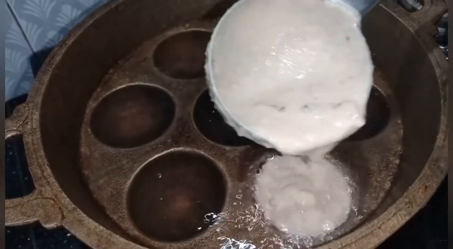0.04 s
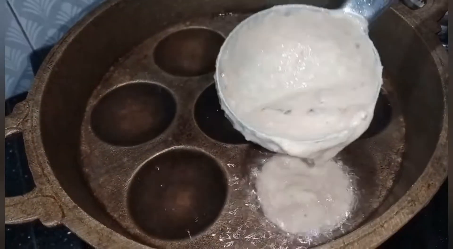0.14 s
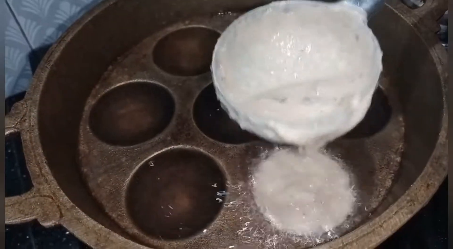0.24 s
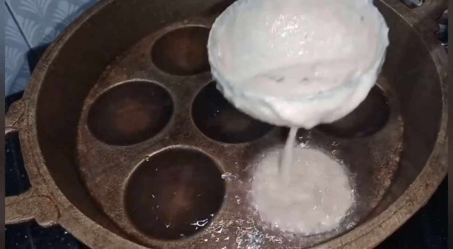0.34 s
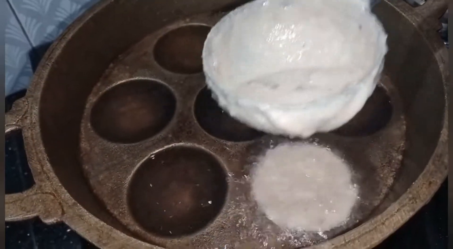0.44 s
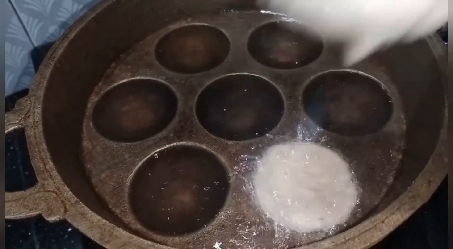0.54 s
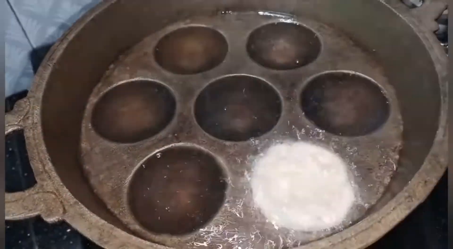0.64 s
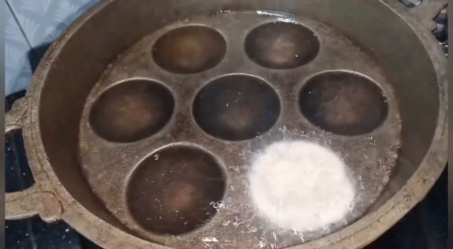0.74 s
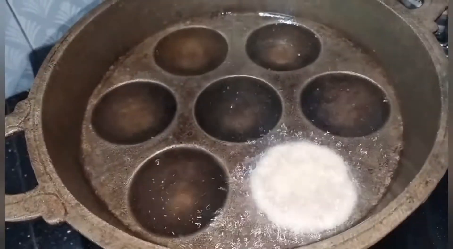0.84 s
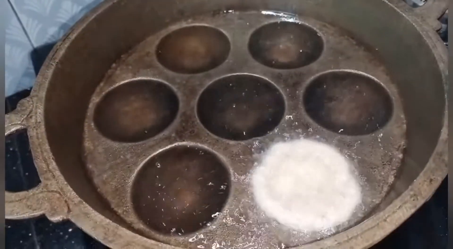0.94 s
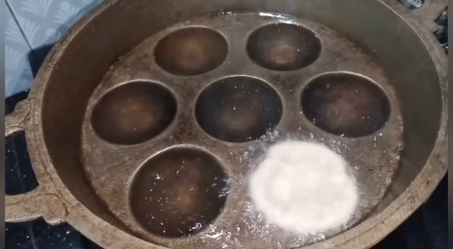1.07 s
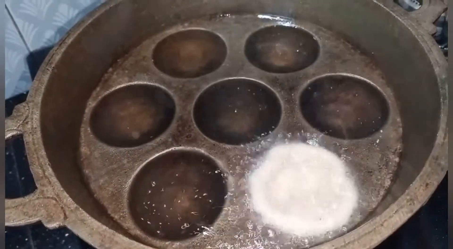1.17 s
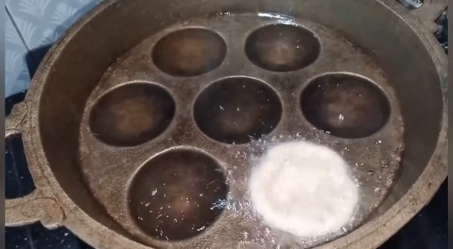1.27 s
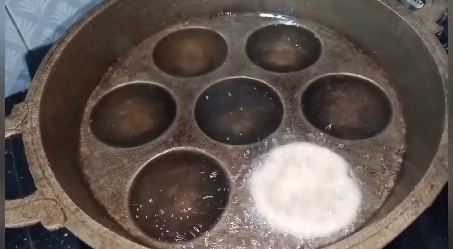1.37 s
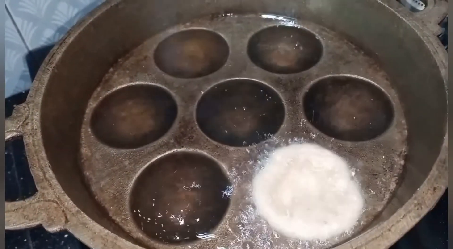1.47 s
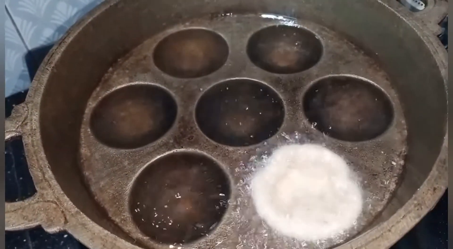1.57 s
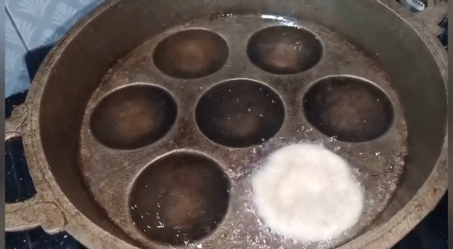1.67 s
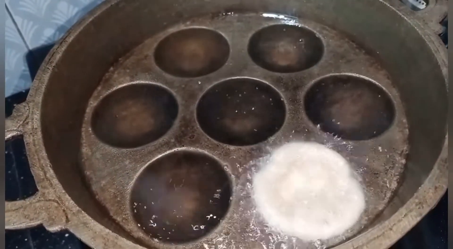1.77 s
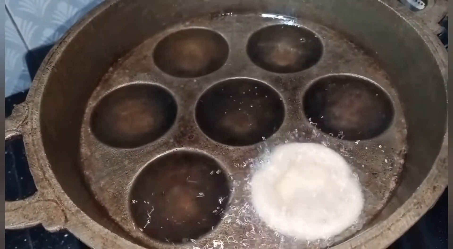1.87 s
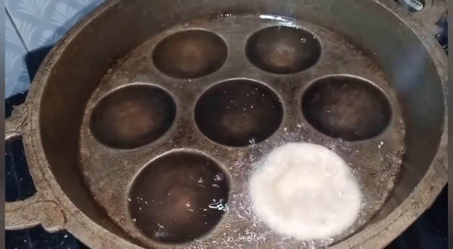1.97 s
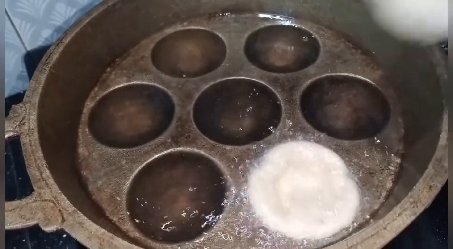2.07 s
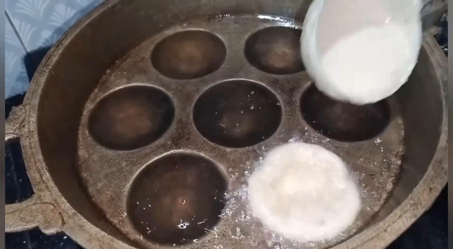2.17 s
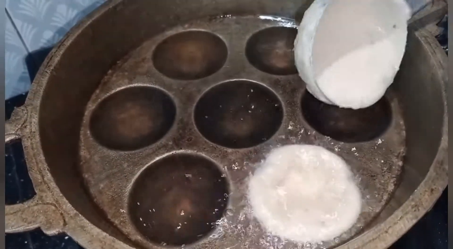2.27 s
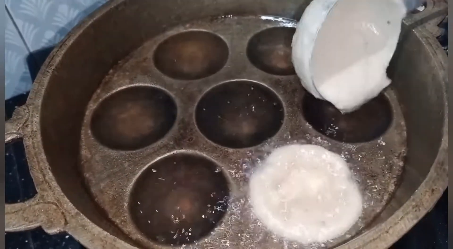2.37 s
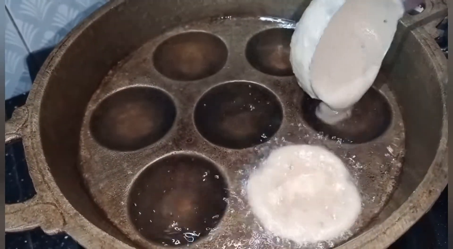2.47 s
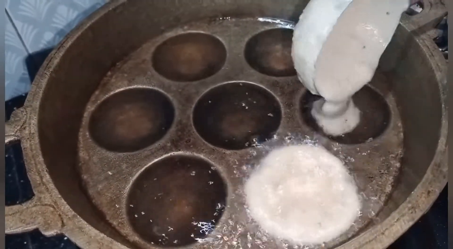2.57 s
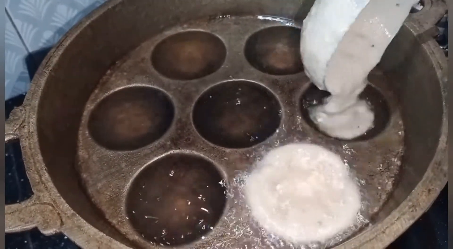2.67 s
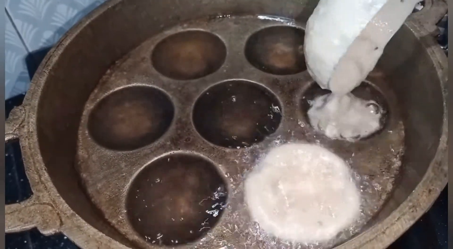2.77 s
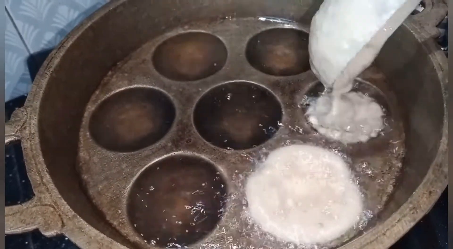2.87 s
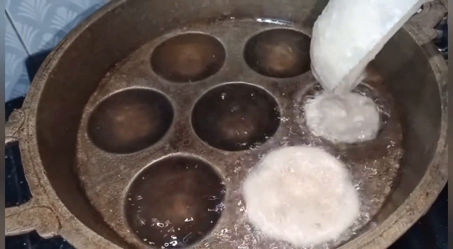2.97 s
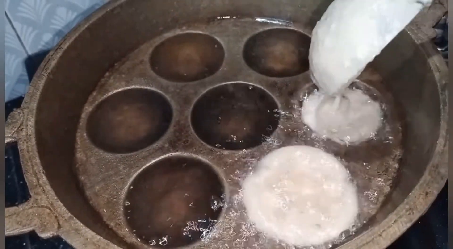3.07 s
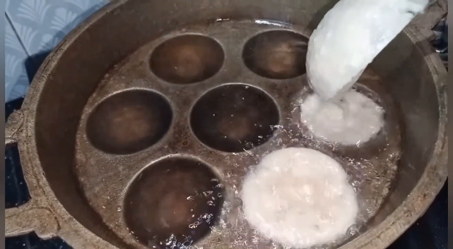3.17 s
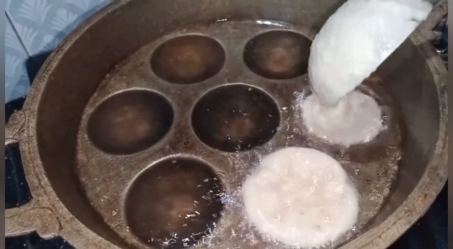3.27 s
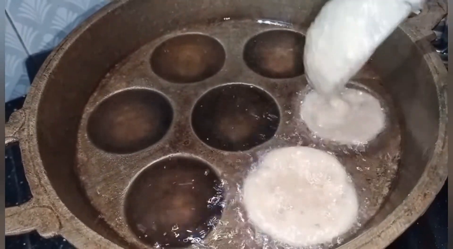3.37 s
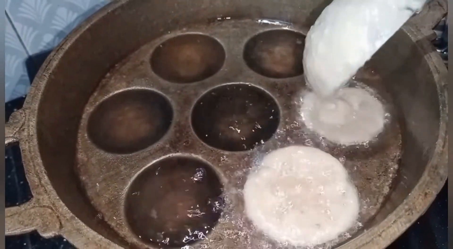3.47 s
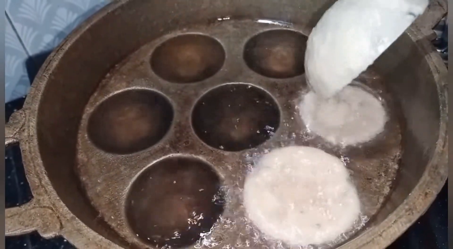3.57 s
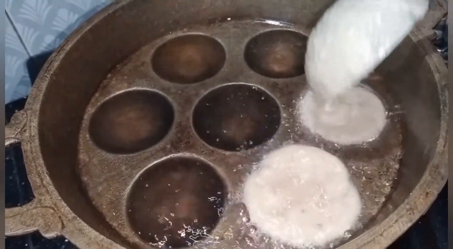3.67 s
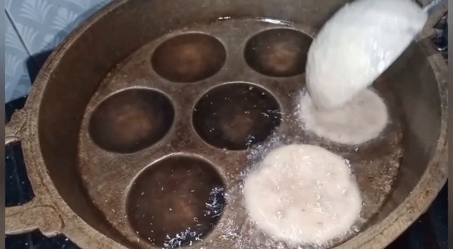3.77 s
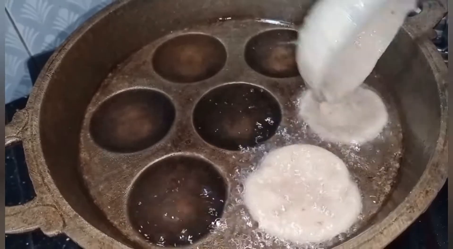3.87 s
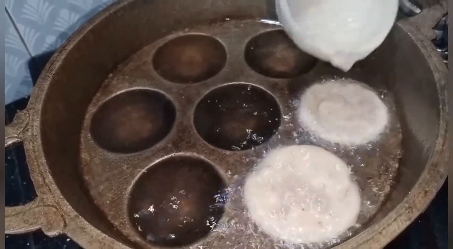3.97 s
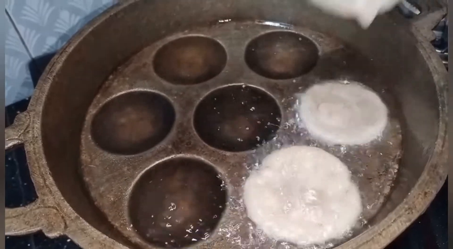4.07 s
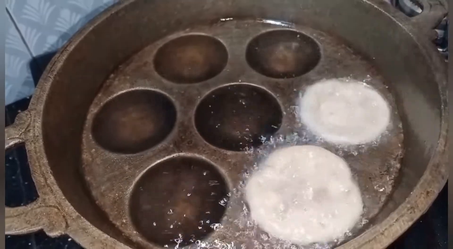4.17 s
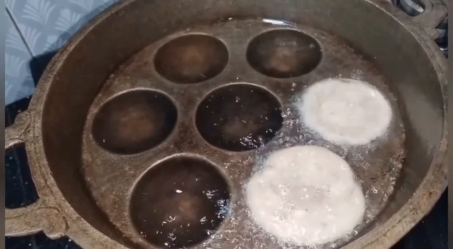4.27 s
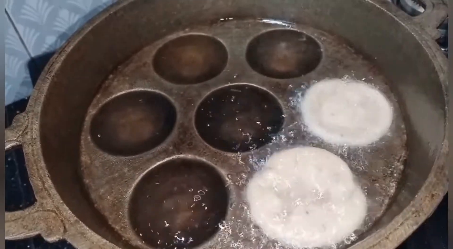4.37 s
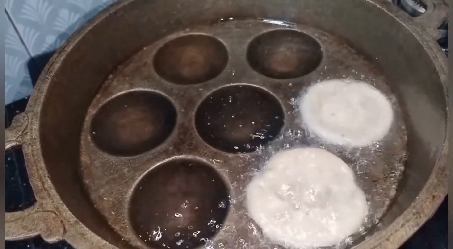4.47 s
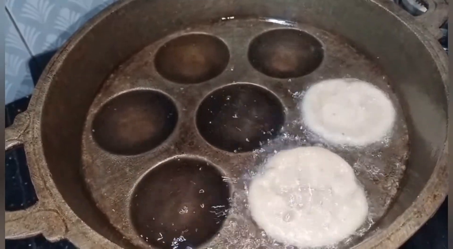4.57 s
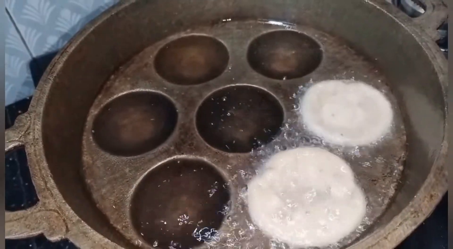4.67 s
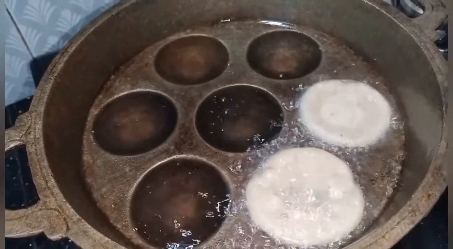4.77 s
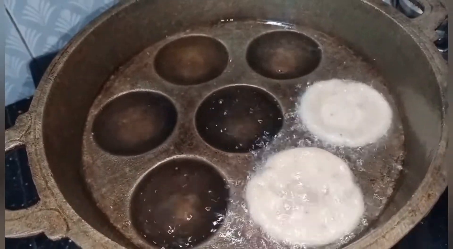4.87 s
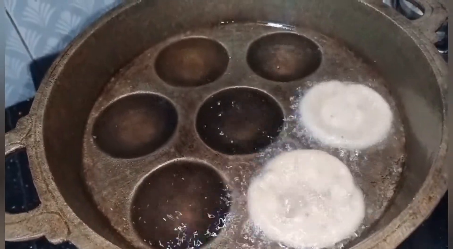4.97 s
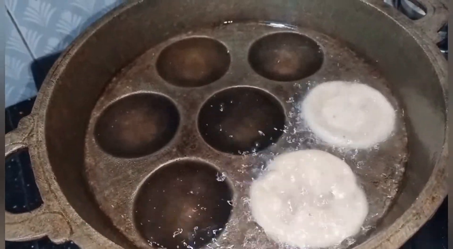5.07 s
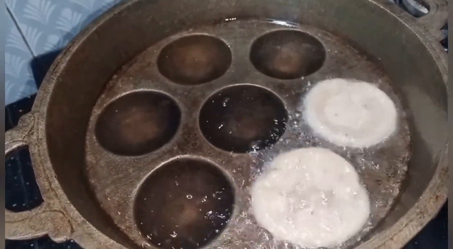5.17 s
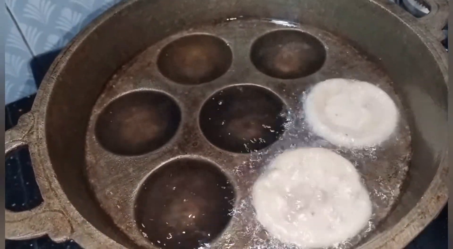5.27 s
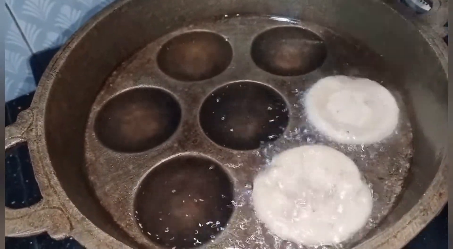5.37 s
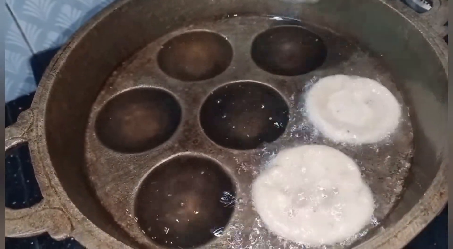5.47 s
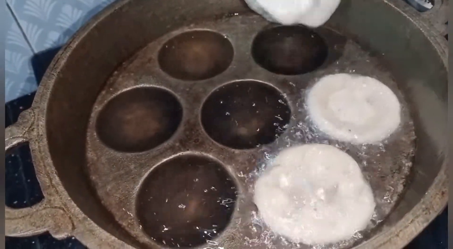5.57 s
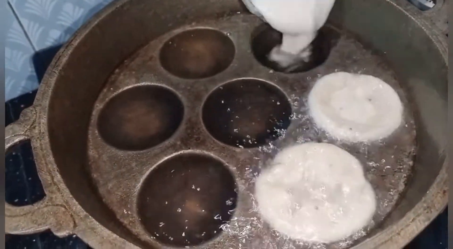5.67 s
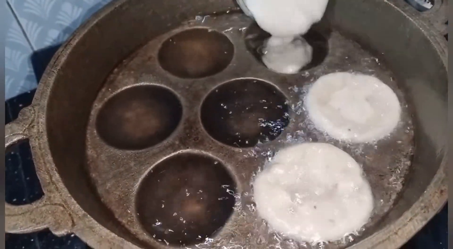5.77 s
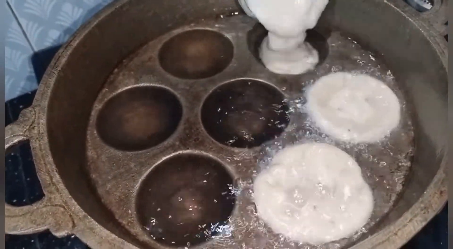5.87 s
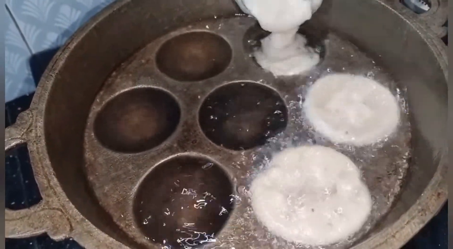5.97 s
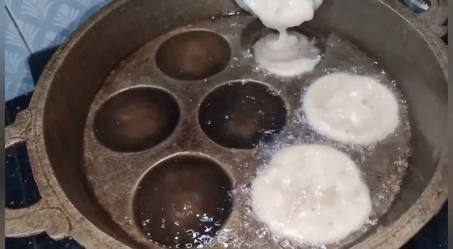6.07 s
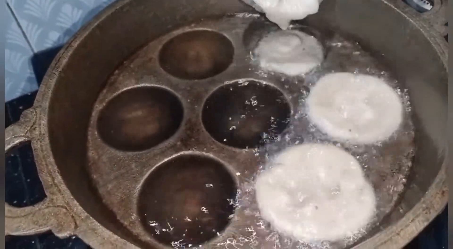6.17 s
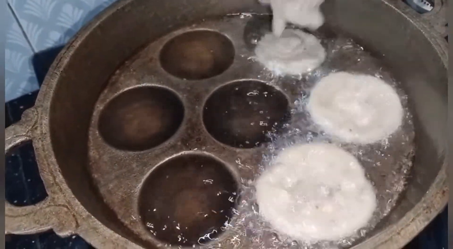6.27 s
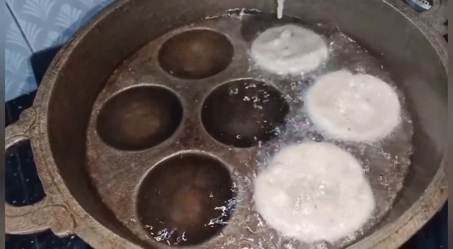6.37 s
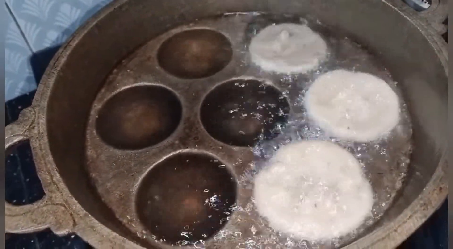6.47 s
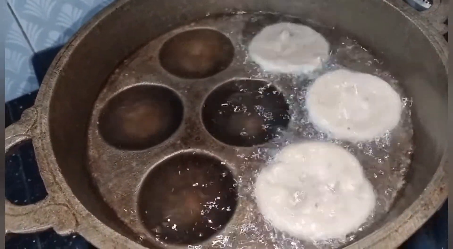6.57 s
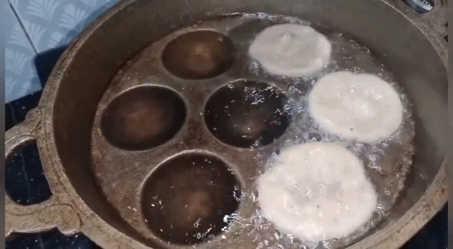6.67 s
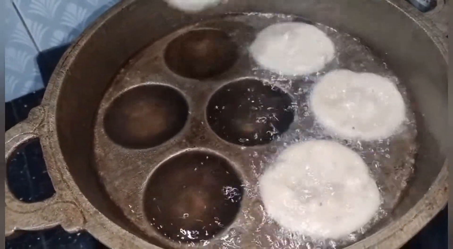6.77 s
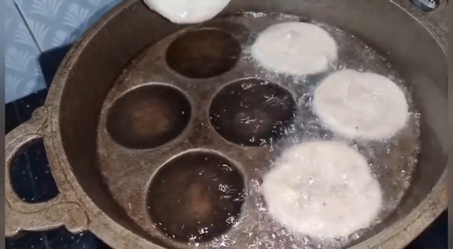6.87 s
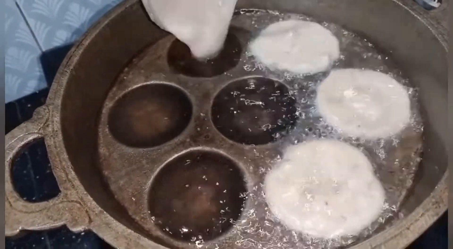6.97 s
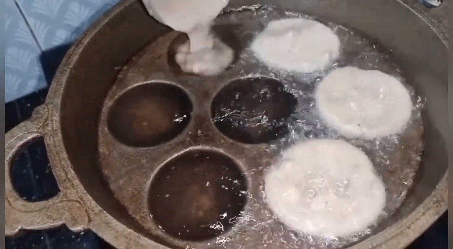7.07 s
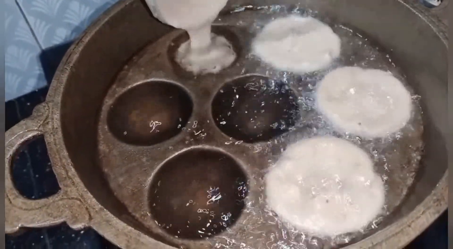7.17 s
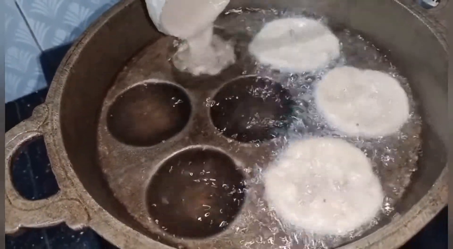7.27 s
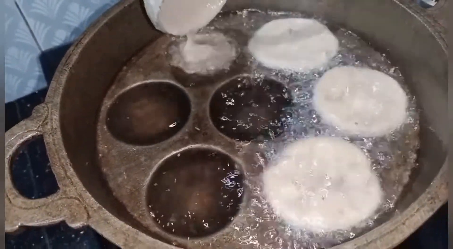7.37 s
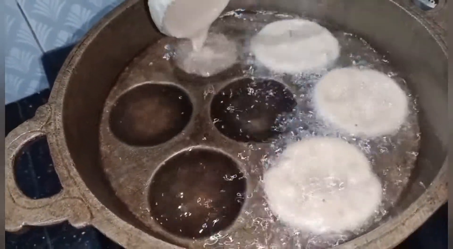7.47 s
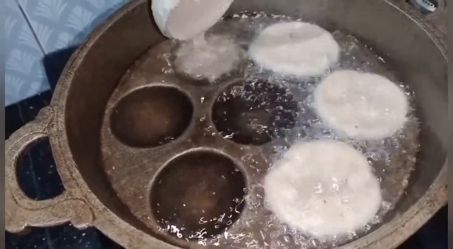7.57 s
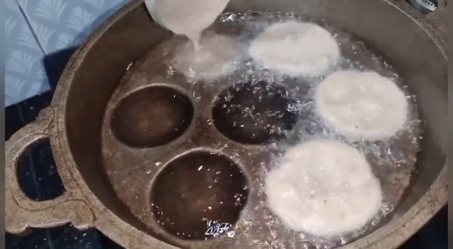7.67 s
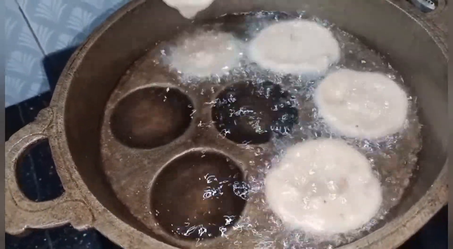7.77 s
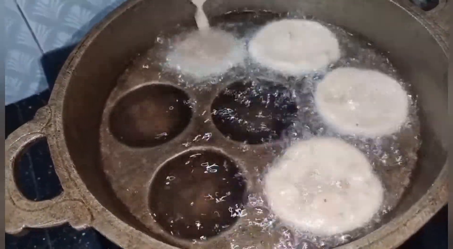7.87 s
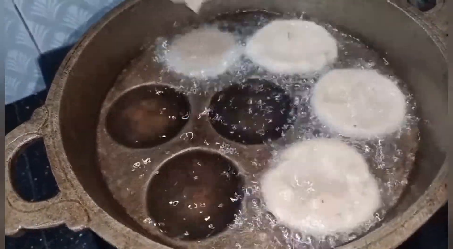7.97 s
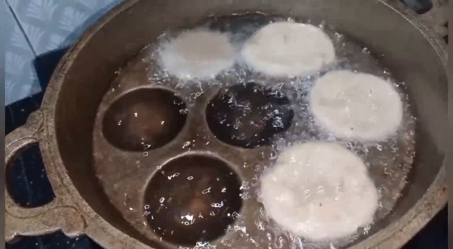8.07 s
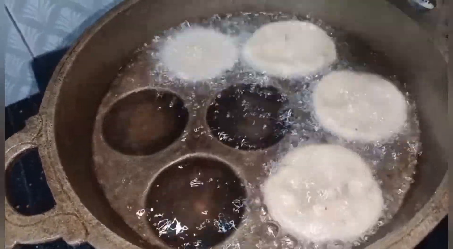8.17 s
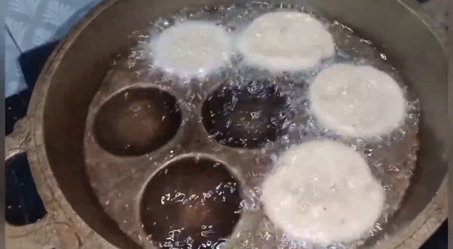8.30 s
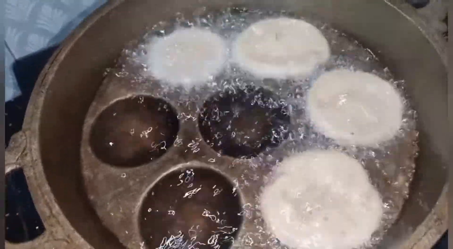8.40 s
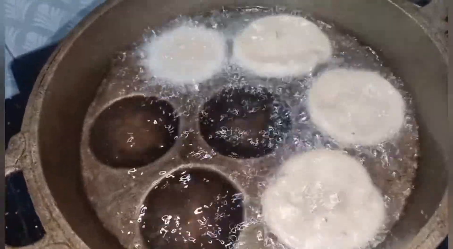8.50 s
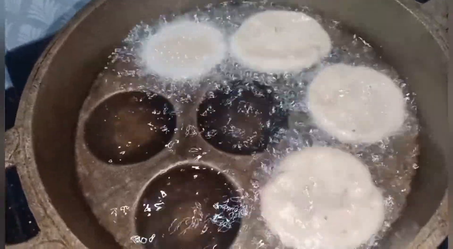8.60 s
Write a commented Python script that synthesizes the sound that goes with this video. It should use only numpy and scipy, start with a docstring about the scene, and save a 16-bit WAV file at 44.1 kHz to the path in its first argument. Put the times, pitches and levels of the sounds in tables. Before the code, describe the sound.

Close to a cast metal pan in a small kitchen, batter already boils fiercely in hot oil, then its sizzle thins. More ladlefuls land near 2.5, 5.7 and 7.1 seconds, each with a short sinking gurgle and a fresh surge of bubbling. Fine fizz, crackle and sharp spits run throughout over a faint stove rush, with two or three muffled bumps at the end.

```python
"""Batter frying in a hollowed pan

A mono microphone stands close to a cast metal pan in a kitchen, over the low rush of a stove.
Each ladleful lands with a sinking gurgle and boils hard; steam bubbles chirp and thin out as it sets.
Damped rings make the bubbles, filtered random ticks the crackle, fizz and mist of the oil, short
bursts the spits. Resonances of the pan colour all but the plips, spits and knocks; a short echo follows."""
import sys
import numpy as np
from scipy import signal
from scipy.fft import rfft, irfft, next_fast_len
from scipy.io import wavfile
from scipy.ndimage import uniform_filter1d, map_coordinates

SR = 44100
rng = np.random.default_rng(int(sys.argv[2]) if len(sys.argv) > 2 else 0)


def wav_out(sig):
    """Save sig, one row per channel (or a flat mono array), as 16-bit PCM at SR to the path in sys.argv[1]."""
    wavfile.write(sys.argv[1], SR, np.round(np.clip(np.atleast_2d(sig).T, -1, 1) * 32767).astype(np.int16))


N = 381024

# ladlefuls of batter, one to a hollow; the first is already down (levels before the trims below):
# (first touch t/s, spreading/s, full boil/s, setting/s, boil level/dB, spitting oil level/dB,
#  power of time that the frying grows by, steam bubble f/Hz, gurgle level/dB, deepest gurgle f/Hz,
#  gurgle length/s)
LADLES = [(-.55, 0.58, 0.084, 2.23, -23.5, -28, 0.57, 1800, -46, 638, 0.92),
          (2.48, 0.69, 0.38, 2.8, -26.5, -34.5, 0.76, 2240, -40.5, 679, .9),
          (5.719, 0.6, 0.09, 2.7, -24, -32, 0.65, 2272, -46, 602, .72),
          (7.149, 0.62, 0.075, 4.1, -22.5, -29.5, 0.59, 2133, -44.5, 574, 0.74)]
BOIL_COLUMN, OIL_COLUMN, STEAM_COLUMN = 4, 5, 7


def amp(db):
    """Decibels to gain."""
    return 10 ** (np.asarray(db) / 20)


def unit(x):
    """Scale to rms 1."""
    return x / np.sqrt(np.mean(x ** 2) + 1e-20)


def along(points, hz):
    """Interpolate (f/Hz, value) points on a log frequency axis."""
    f, v = np.transpose(points)
    return np.interp(np.log(hz + 1), np.log(f + 1), v)


def curves(rows):
    """One value per sample for each column after the time."""
    s, *columns = np.transpose(rows)
    return [np.interp(np.arange(N) / SR, s, column) for column in columns]


def wobble(rate):
    """A smooth random curve, rate knots a second."""
    knots = rng.standard_normal(N // 20)
    return unit(map_coordinates(knots, [np.arange(N) * rate / SR], mode="wrap"))


def coloured(x, points, peaks=(), size=8192):
    """Minimum-phase filter: the source's own spectrum and peaks, times those of the pan."""
    # peaks and nulls of the air between the pan's walls: (f/Hz, width/Hz, level/dB)
    pan_peaks = [(353, 77, 7), (543.6, 73, 9.5), (606, 91, -8), (722, 59, 6), (943, 35, 2.5),
                 (1906, 55, -7), (2253, 1260, 8.5), (3110, 99, 3.5), (4210, 140, -5.5), (5020, 170, -4.5)]
    hz = np.fft.rfftfreq(size, 1 / SR)
    db = along(points, hz)
    for f, width, gain in [*pan_peaks, *peaks]:
        db = db + gain / (1 + (2 * (hz - f) / width) ** 2)
    # folding the cepstrum forward in time makes the filter causal
    cepstrum = irfft(np.log(amp(db)))
    cepstrum[1:size // 2] *= 2
    cepstrum[size // 2 + 1:] = 0
    return signal.fftconvolve(x, irfft(np.exp(rfft(cepstrum))))[:N]


def placed(times, grains):
    """Sum one row of samples at each start time."""
    index = (np.abs(times) * SR).astype(int)[:, None] + np.arange(grains.shape[1])
    return np.bincount(index.ravel(), grains.ravel(), N)[:N]


def bubbles(times, hz, gain, cycles, rise, size=400):
    """Damped rings whose pitch climbs by the share rise as each bubble nears the surface."""
    # age is in decay times, each as long as the given number of cycles
    age = np.arange(size) / SR * hz[:, None] / cycles
    phase = cycles * (age + rise * (age - 1 + np.exp(-age)))
    swell = np.exp(-age) * (1 - np.exp(-2 * np.pi * age)) * np.linspace(1, 0, size)
    return placed(times, gain[:, None] * swell * np.sin(2 * np.pi * phase))


def ticks(rate, spread_db):
    """One-sample ticks of either sign at random moments, rate a second, of scattered strength."""
    happens = rng.random(N) < rate / SR
    strength = amp(spread_db * np.clip(rng.standard_normal(N), -2, 2))
    return unit(happens * rng.choice([-1, 1], N) * strength)


def flurries(fast_db, slow_db, fast_rate, slow_rate):
    """Bursts come in clumps: a fast and a slow random gain."""
    return amp(fast_db * np.tanh(wobble(fast_rate)) + slow_db * np.tanh(wobble(slow_rate)))


def cooking(ladle, fall_db, slowness, lag=0):
    """Gain of one cake's frying: it grows with the wetted area, holds, then falls as a crust forms."""
    touch, spreading, full, setting, _, _, growth, *_ = ladle
    age = np.arange(N) / SR - touch - lag
    # slowness: time constant as a multiple of the setting time
    crust = 1 - np.exp(-np.maximum(age - spreading - full, 0) / (setting * slowness))
    return np.clip(age / spreading, 0, 1) ** growth * amp(-fall_db * crust)


def together(gains):
    """Level in dB of unrelated sources that sound at once."""
    return 10 * np.log10(sum(gain ** 2 for gain in gains) + 1e-12)


def strays(level_db, low_hz, high_hz, count):
    """Random events (t/s, level/dB, f/Hz) whose strength follows a level."""
    when, strength, pitch = rng.random((count, 3)).T
    db = level_db[(when * N).astype(int)] + 6 * (strength - .5)
    return np.column_stack([when * N / SR, db, low_hz * (high_hz / low_hz) ** pitch])


def cake(gain, hollow, hover, centre_hz, scatter, spread_db, seethe_db, count=3200):
    """Steam bubbles chirp under one cake over a dense seething; the hollow's ring shifts as the ladle lifts."""
    # spectrum of the boil: (f/Hz, relative level/dB)
    boil_spectrum = [(40, -35), (300, -39), (800, -25), (1500, -6), (2200, -3.5), (2800, -2.5), (3600, 4.5),
                     (4100, -3), (6000, -14.5), (12000, -44)]
    lift_s = 0.24  # how slowly the ladle draws away
    pitch, strength = rng.standard_normal((count, 2)).T
    when = rng.random(count) * N / SR
    sizes = amp(spread_db * np.minimum(strength, 1.5))
    chirps = bubbles(when, centre_hz * np.exp(scatter * pitch), sizes, cycles=10.4, rise=0.11, size=600)
    clumps = flurries(fast_db=1.3, slow_db=.8, fast_rate=160, slow_rate=55)
    seethe = ticks(rate=11000, spread_db=2.5) * clumps
    steam = unit(chirps) + amp(seethe_db) * unit(seethe)
    lifted, ratio, depth = hover
    under_ladle = [(hz * ratio, width, db * depth) for hz, width, db in hollow]
    free = coloured(steam, boil_spectrum, hollow)
    covered = coloured(steam, boil_spectrum, under_ladle)
    away = (1 + np.tanh((np.arange(N) / SR - lifted) / lift_s)) / 2
    return gain * amp(-1.5) * (away * free + (1 - away) * covered) / np.std(free)


def flares():
    """Wet batter reaches fresh hot oil: a spell of crackle swells in one band and dies away."""
    # spells: (peak t/s, rise/s, fall/s, level/dB, centre f/Hz, width/octaves)
    spells = [(0.15, .2, 0.31, -33, 3050, 0.26), (0.36, 0.054, 0.095, -27, 4300, 0.3),
              (2.90, 0.016, .12, -40, 2800, 0.5), (3.22, 0.71, 0.089, -39.5, 1390, 0.75),
              (6.05, .018, 0.021, -29, 3600, 0.45), (6.34, 0.03, 0.075, -24, 2920, 0.64),
              (6.54, 0.064, 0.06, -29, 5470, 0.51), (7.2, 0.4, 0.48, -35, 1500, .7),
              (7.68, 0.44, .12, -30.5, 1680, 0.27), (8.16, 0.11, 0.28, -32, 5300, 0.29),
              (8.55, .08, 0.11, -30, 5870, 0.51)]
    t = np.arange(N) / SR
    hz = np.geomspace(100, SR / 2, 300)
    total = np.zeros(N)
    clumps = flurries(fast_db=11.5, slow_db=2.0, fast_rate=150, slow_rate=45)
    for s, rise, fall, db, centre_hz, octaves in spells:
        band_db = -20 * np.log10(1 + (np.log2(hz / centre_hz) / octaves) ** 4 / 4)
        sparks = clumps * ticks(rate=3300, spread_db=2.5)
        crackle = unit(coloured(sparks, np.column_stack([hz, band_db])))
        envelope = np.exp(-np.where(t < s, ((s - t) / rise) ** 2, (t - s) / fall))
        total += amp(db) * crackle * envelope
    return total


def welling():
    """Bigger bubbles plop in the oil around the cakes, following the boil a little late."""
    # spectrum of the plops: (f/Hz, relative level/dB)
    well_spectrum = [(40, -52), (150, -16), (400, -14.5), (540, -8.5), (750, 2), (1000, 4.5), (1300, 4),
                     (1800, -1), (4000, -24)]
    level_db = together(amp(ladle[BOIL_COLUMN]) * cooking(ladle, fall_db=30.6, slowness=1.87, lag=0.012)
                        for ladle in LADLES)
    plops = unit(coloured(ticks(rate=2200, spread_db=5.0), well_spectrum))
    return amp(level_db - 10.5) * plops


def crackling(cycles=9, count=5000):
    """Water flashes to steam in the oil in short flurries; some of the bubbles ring briefly."""
    # spectrum of the crackle: (f/Hz, relative level/dB)
    crackle_spectrum = [(40, -40), (200, -27), (800, -14), (2000, -4.5), (4000, -1), (5600, 2.5),
                        (7000, -4.5), (8600, 1.5), (9800, -13), (11500, -13.5), (13000, -22), (15500, -33)]
    bare_oil = amp(-41.5)
    around_cakes = [amp(ladle[OIL_COLUMN]) * cooking(ladle, fall_db=23.5, slowness=0.87, lag=0.16)
                    for ladle in LADLES]
    level_db = together([bare_oil, *around_cakes])
    clumps = flurries(fast_db=4.5, slow_db=1.5, fast_rate=150, slow_rate=38)
    sparks = ticks(rate=3400, spread_db=3.5) * clumps
    when, pitch, strength = rng.random((count, 3)).T
    ring_hz = 3000 * 3.2 ** pitch
    pings = bubbles(when * N / SR, ring_hz, amp(20.0 * strength), cycles, rise=0.028, size=300)
    return amp(level_db + 3.0) * unit(coloured(unit(sparks) + amp(-11) * unit(pings), crackle_spectrum))


def fizzing(level_db):
    """Fine bubbles burst along the rims of the cakes."""
    # spectrum of the fizz: (f/Hz, relative level/dB)
    fizz_spectrum = [(2000, -26.5), (5000, -8.5), (7000, -5), (8100, -0.5), (8500, 2), (9000, 0.5),
                     (9500, -9.5), (10100, -18.5), (11200, -11), (12500, -17), (15200, -47)]
    clumps = flurries(fast_db=3.5, slow_db=0.6, fast_rate=170, slow_rate=33)
    sparks = ticks(rate=6000, spread_db=3.5) * clumps
    return amp(level_db) * unit(coloured(sparks, fizz_spectrum))


def misting(fizz_db, boil_db):
    """The tiniest droplets prickle above the fizz, build as the pan fills and thin while wet batter boils."""
    # spectrum of the mist: (f/Hz, relative level/dB)
    mist_spectrum = [(5000, -42), (8500, 2), (10000, 5.5), (11200, 8.5), (12400, 1), (13600, 2), (15200, 3)]
    # dB per dB of fizz, dB per dB of boil, dB per second
    swing_db = 1.02 * fizz_db - 0.082 * boil_db + 0.33 * np.arange(N) / SR
    clumps = flurries(fast_db=4.0, slow_db=2.2, fast_rate=180, slow_rate=47)
    sparks = ticks(rate=4000, spread_db=7.5) * clumps
    return amp(-38 + swing_db - swing_db.mean()) * unit(coloured(sparks, mist_spectrum))


def sputter(rate, life, depth):
    """Each drop of water that meets the oil makes it flare at once and settle."""
    drops = (rng.random(N) < rate / SR) * 1.0
    return unit(1 + depth * signal.lfilter([1], [1, -np.exp(-1 / (life * SR))], drops))


def pour(ladle, scatter, spread_db, count=380):
    """Bubbles sink in pitch as the steam pocket widens, then climb; the batter's thin edge hisses higher."""
    touch_hz, sink_s, climb_after, climb_hz_per_s = 2050, 0.0793, 0.705, 1030  # climb_after: share of length
    fade_s = 0.17  # the gurgle fades over its last moments
    edge_hz, edge_db, touch_boost_db, touch_s = 3280, -2.5, 10, 0.082  # edge strongest touch_s after the touch
    touch, *_, level_db, deepest_hz, length = ladle
    age = (np.arange(count) + rng.random(count)) / count * length
    sinking = (touch_hz - deepest_hz) * np.exp(-age / sink_s)
    climbing = climb_hz_per_s * np.maximum(age - climb_after * length, 0)
    hz = deepest_hz + sinking + climbing
    # bubbles due before the start stay silent
    flow = np.clip((length - age) / fade_s, 0, 1) * (touch + age > 0)
    sizes = flow * amp(spread_db * rng.uniform(-3.3, 1, count)) * (hz / deepest_hz) ** 0.28
    scattered_hz = hz * np.exp(scatter * rng.standard_normal(count))
    gurgle = bubbles(touch + age, scattered_hz, sizes, cycles=9.7, rise=0.11, size=1400)
    hiss = flow * amp(edge_db + touch_boost_db * age / touch_s * np.exp(1 - age / touch_s))
    edge = bubbles(touch + age, rng.normal(edge_hz, 140, count), hiss, cycles=15.0, rise=0.012)
    return amp(level_db) * (gurgle + edge)


def spits(fizz_db, ring_s, life, spray_db, size=900):
    """A droplet bursts with a snap of a few cycles and throws a brief spray around the same pitch."""
    # the loudest droplets that burst in the oil: (t/s, level/dB, f/Hz)
    droplets = [(0.0498, -12, 6400), (0.1372, -16, 8800), (0.1812, -16, 11000), (0.947, -16, 8500),
                (1.277, -16, 8300), (1.3265, -14, 8600), (1.690, -15, 8700), (1.8946, -13.5, 7000),
                (2.3918, -20, 6300), (2.7412, -17, 8500), (2.9524, -18, 8300), (3.1787, -16, 6400),
                (3.3446, -15.5, 5500), (3.3874, -16, 8300), (4.3851, -13.5, 8500), (4.5676, -14, 8700),
                (4.5694, -20, 12600), (4.963, -16, 6500), (5.458, -17, 8700), (6.341, -14, 5400),
                (6.8278, -13, 5400), (6.9617, -14, 6000), (7.4754, -10.5, 8700), (8.171, -5.5, 5600),
                (8.2237, -11.5, 10100), (8.4775, -12.5, 9900)]
    smaller = strays(fizz_db + 6, low_hz=5530, high_hz=9400, count=18)
    s, db, hz = np.vstack([droplets, smaller]).T[:, :, None]
    t = np.arange(size) / SR
    snap = t / ring_s * np.exp(1 - t / ring_s)
    noise = uniform_filter1d(rng.standard_normal((len(s), size)), size=15, axis=1)
    spray = unit(noise) * np.exp(-t / life)
    return placed(s[:, 0], amp(db) * (snap + amp(spray_db) * spray) * np.cos(2 * np.pi * hz * t))


def blips(boil_db, stray_rise):
    """Single large bubbles plip and bend upward; the smaller ones are stronger while the batter boils hard."""
    # the largest steam bubbles from under the batter:
    # (t/s, level/dB before a trim, f/Hz part-way up the bend, upward bend as a share of the starting pitch)
    large = [(0.095, -14, 2280, .1), (1.071, -27, 1150, .1), (1.573, -25, 1670, .1),
             (2.502, -23, 2000, .05), (2.737, -19, 1850, .42), (2.8469, -11.5, 2140, .42),
             (2.8928, -17, 2250, .42), (2.9302, -18, 2400, .42), (2.992, -18, 2100, .42),
             (3.134, -17, 3150, .1), (3.174, -30, 780, .05), (3.195, -18, 2150, .42),
             (3.2302, -15, 2080, .42), (3.337, -17, 2100, .3), (3.358, -17, 3200, .05),
             (3.385, -17, 2900, .15), (3.500, -16, 2260, .1), (4.569, -22, 3240, .1),
             (4.847, -22, 2390, .1), (5.815, -29, 950, .05), (5.915, -32, 560, .05), (6.008, -24, 1260, .3),
             (6.0297, -18.5, 2290, .2), (6.045, -33, 560, .05), (6.115, -32, 540, .05),
             (6.137, -17, 2130, .1), (6.2165, -13.5, 2120, .2), (6.3627, -14, 2500, .3),
             (7.545, -14, 2150, .3), (7.70, -13, 2120, .3), (7.765, -14, 2250, .3), (7.888, -14, 2160, .2),
             (7.9094, -12.5, 2350, .05), (7.9568, -11, 2370, .05), (8.032, -14, 2330, .05),
             (8.189, -15, 2410, .05), (8.264, -16, 2430, .05), (8.518, -15, 2420, .05)]
    smaller = strays(boil_db - 9, low_hz=1920, high_hz=2960, count=20)
    smaller = np.column_stack([smaller, np.full(len(smaller), stray_rise)])
    s, db, hz, rise = np.vstack([large, smaller]).T
    start_hz = hz / (1 + .4 * rise)
    return bubbles(s, start_hz, amp(db - 1), cycles=16, rise=rise[:, None], size=1800)


def volleys(count=22):
    """Big bubbles follow each other out from under a cake, uneven in size, pitch and spacing."""
    # volleys while a cake boils hardest:
    # (start t/s, length/s, middle level/dB, f/Hz, pitch scatter as a share, twice the upward bend as a share)
    runs = [(2.95, .8, -21, 2300, .3, .35), (6.08, .55, -20.5, 2400, .17, .25),
            (7.5, .38, -21, 2100, .2, .3), (7.84, .26, -18, 2330, .07, .05)]
    total = np.zeros(N)
    for start, length, db, hz, scatter, rise in runs:
        when, strength, pitch = rng.uniform(-1, 1, (count, 3)).T
        times = start + length * (1 + when) / 2
        gain = amp(db + 4 * strength)
        total += bubbles(times, hz * np.exp(scatter * pitch), gain, cycles=11, rise=rise / 2, size=1100)
    return total


def knocks():
    """A few muffled bumps ring low and die quickly."""
    # soft, dull bumps: (t/s, level/dB)
    bumps = [(8.454, -40), (8.469, -27), (8.591, -33)]
    # what they ring with: (f/Hz, level/dB, t60/s)
    bump_modes = [(217, -2, 0.033), (349, -5, 0.1)]
    s, db = np.transpose(bumps)
    t = np.arange(SR // 4) / SR
    ring = sum(amp(level - 60 * t / t60) * np.sin(2 * np.pi * hz * t) for hz, level, t60 in bump_modes)
    return placed(s, amp(db)[:, None] * ring * (1 - np.exp(-t / 0.0027)))


def stove():
    """The low rush of the stove: steady noise, coloured by the pan as well."""
    # spectrum of the rush: (f/Hz, relative level/dB)
    rush_spectrum = [(20, -18), (50, -11.5), (90, -2.5), (150, 1.5), (210, 6), (280, -1.5), (400, 2),
                     (800, -1.5), (3000, -17), (15000, -27)]
    return amp(-49.5) * unit(coloured(rng.standard_normal(N), rush_spectrum))


def room(x, count=12):
    """The kitchen's short echo, with a fresh random tail for each of count equal stretches; bass dies first."""
    # decay between the walls: (f/Hz, t60/s)
    wall_decay = [(200, 0.16), (2000, 0.76), (12000, 0.4)]
    hz, t, z = signal.stft(rng.standard_normal((count, SR // 3)), SR, nperseg=256)
    tails = signal.istft(z * amp(-60 * t / along(wall_decay, hz)[:, None]), SR, nperseg=256)[1]
    tails = tails / np.linalg.norm(tails, axis=1, keepdims=True)
    pieces = np.pad(x, (0, -N % count)).reshape(count, -1)
    starts = np.arange(count) * pieces.shape[1] / SR
    return placed(starts, signal.fftconvolve(pieces, tails, axes=1))


def scene():
    """The frying pan, its echo and the stove, the same in both channels."""
    # each hollow's own peaks and nulls, one list to a cake: (f/Hz, width/Hz, level/dB)
    hollows = [
        [(1704, 110, 13), (1990, 110, -10), (2140, 130, 6.5), (3050, 660, 5.5), (4290, 300, -3)],
        [(1230, 140, 12.5), (2020, 510, 6), (3360, 770, 4.5), (4340, 300, 8), (5720, 300, 10), (6800, 900, -17)],
        [(986, 120, 25), (1220, 130, 12.5), (1790, 130, 7), (3240, 340, 2.5), (4400, 500, 11)],
        [(965, 220, 20), (1570, 300, 5.5), (2400, 450, 3.5), (4460, 940, 12)],
    ]
    # the ladle over a hollow damps its ring and may lower it, one row to a ladleful:
    # (ladle half away t/s, pitch ratio under the ladle, share of the peaks' dB left under it)
    hovers = [(.6, 1, 0.68), (4.1, 1, 0.5), (6.6, 0.96, 0.88), (7.75, 1, .5)]
    # the fine fizz: (t/s, level/dB)
    fizz_level = [(0, -38.5), (0.4, -28), (1.0, -29.5), (1.65, -31), (2.2, -34.5), (2.6, -34.0),
                  (3.1, -37.5), (3.85, -34.5), (4.6, -31), (5.5, -34.5), (6.25, -33.5), (6.55, -30.5),
                  (6.82, -32.5), (7.05, -28), (7.5, -28.9), (7.8, -32), (8.64, -28)]
    fizz_db, = curves(fizz_level)
    boils = [amp(ladle[BOIL_COLUMN]) * cooking(ladle, fall_db=28, slowness=1) for ladle in LADLES]
    boil_db = together(boils)
    cakes = sum(cake(gain, hollow, hover, ladle[STEAM_COLUMN], scatter=0.2366, spread_db=2.5, seethe_db=9.0)
                for gain, hollow, hover, ladle in zip(boils, hollows, hovers, LADLES))
    drops = sputter(rate=110, life=0.0027, depth=0.44)
    fine = fizzing(fizz_db) + misting(fizz_db, boil_db)
    oil = welling() + np.sqrt(drops) * crackling() + drops * fine
    pours = sum(pour(ladle, scatter=0.13, spread_db=4.5) for ladle in LADLES)
    gurgles = coloured(pours, [(100, -11), (400, 0)])
    snaps = spits(fizz_db, ring_s=.00018, life=.003, spray_db=-12)
    plips = blips(boil_db, stray_rise=.25) + volleys()
    pan = cakes + flares() + oil + gurgles + snaps + plips + knocks()
    return np.tile(pan + amp(-9.5) * room(pan) + stove(), (2, 1))


def record(dry):
    """The microphone rolls off below 60 Hz; nothing is kept above the band limit of 15600 Hz."""
    size = next_fast_len(N + SR // 2)
    hz = np.fft.rfftfreq(size, 1 / SR)
    response = hz / np.hypot(hz, 60) * (hz < 15600)
    return irfft(rfft(dry, size) * response, size)[:, :N]


dry = scene()
out = record(dry)
wav_out(out)
```